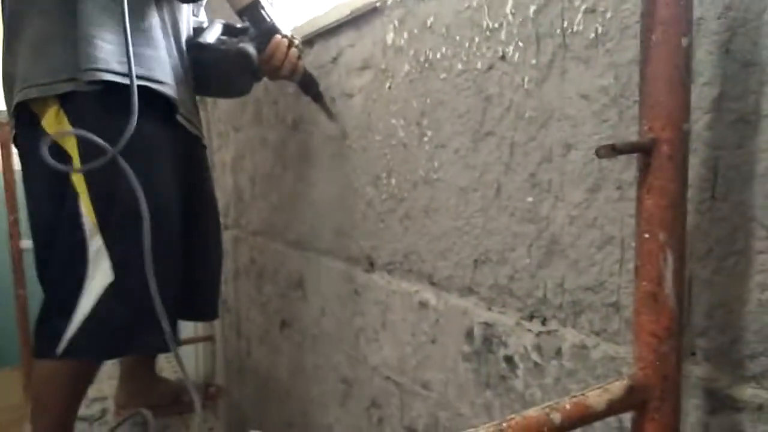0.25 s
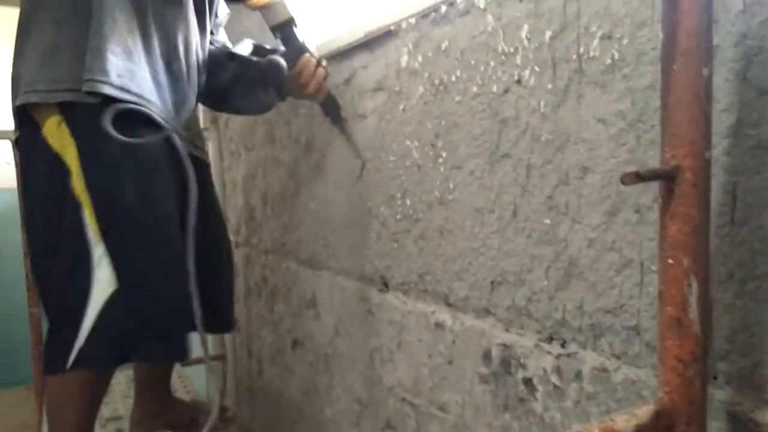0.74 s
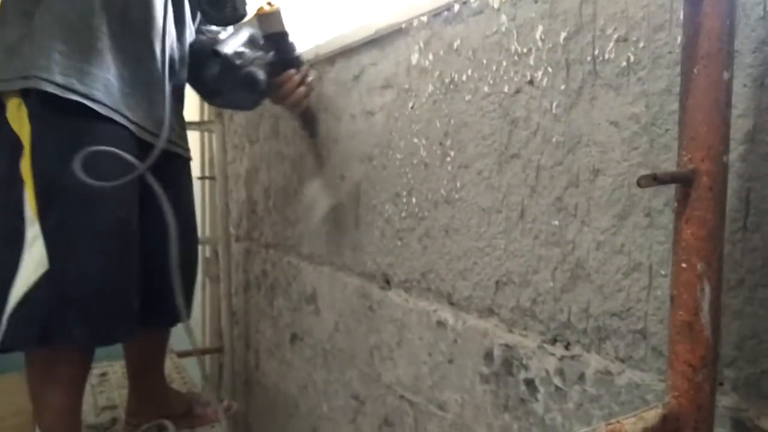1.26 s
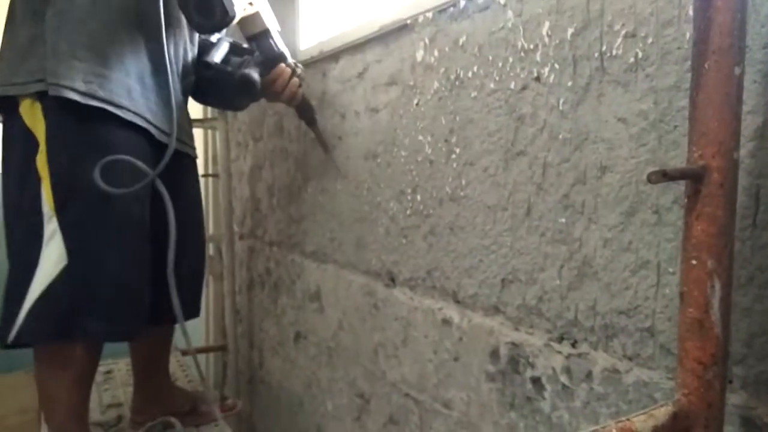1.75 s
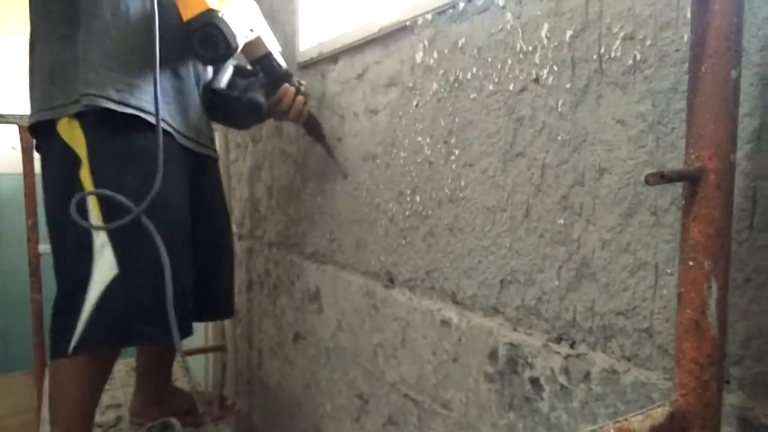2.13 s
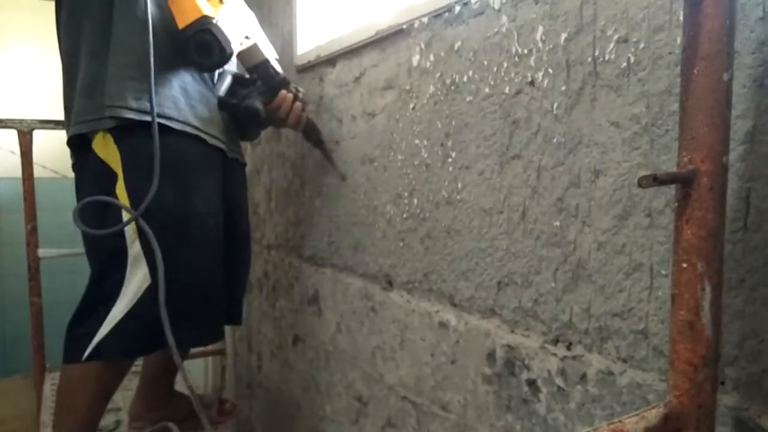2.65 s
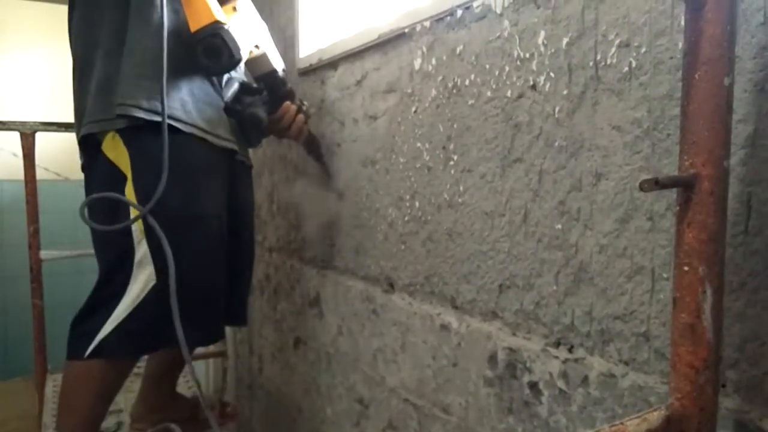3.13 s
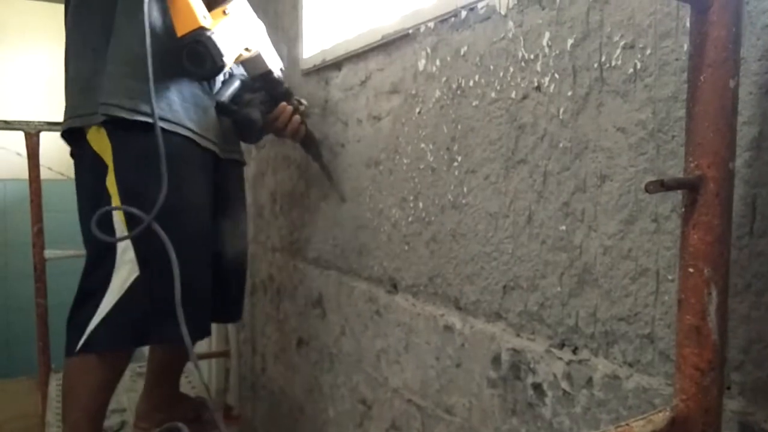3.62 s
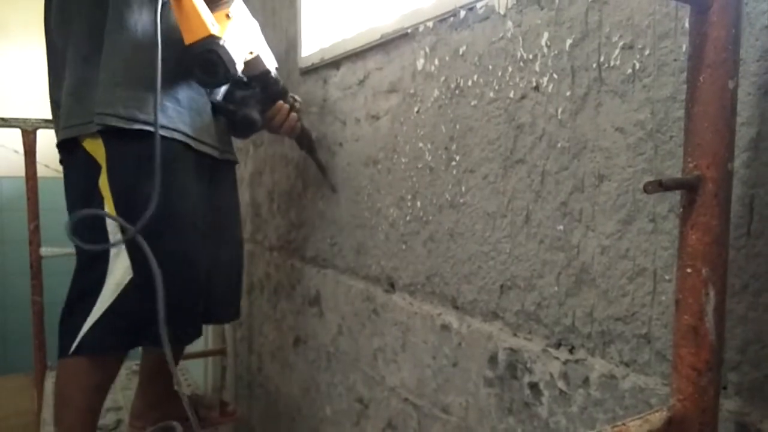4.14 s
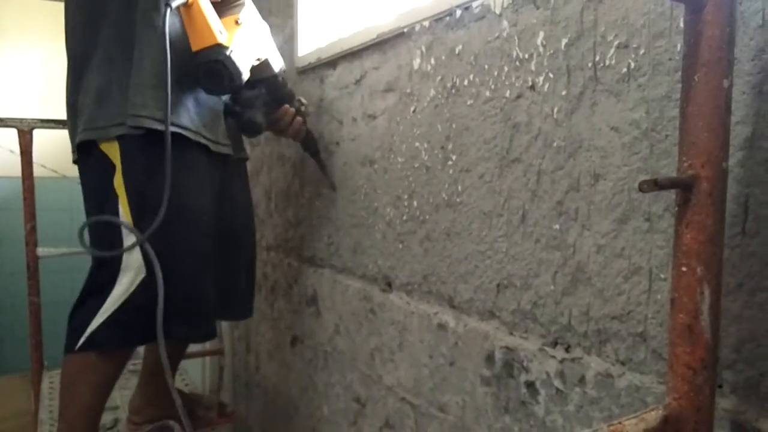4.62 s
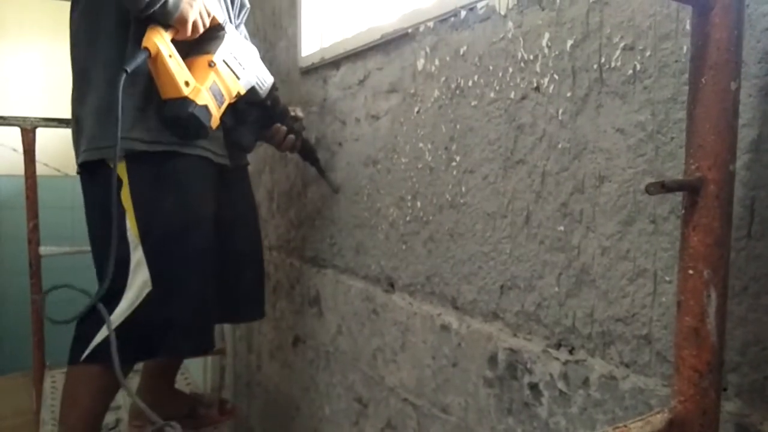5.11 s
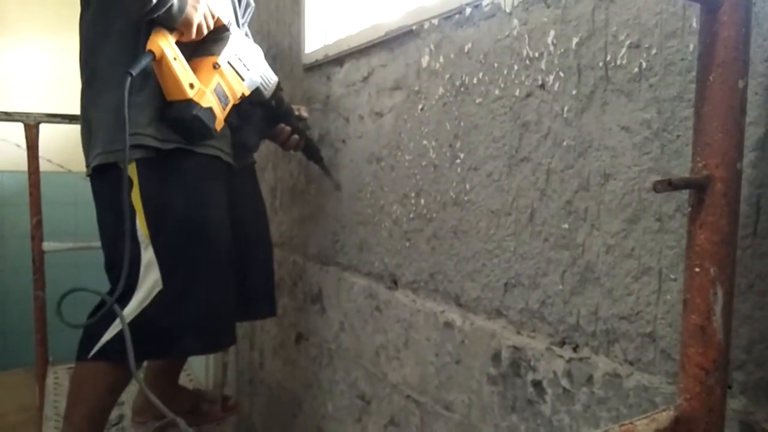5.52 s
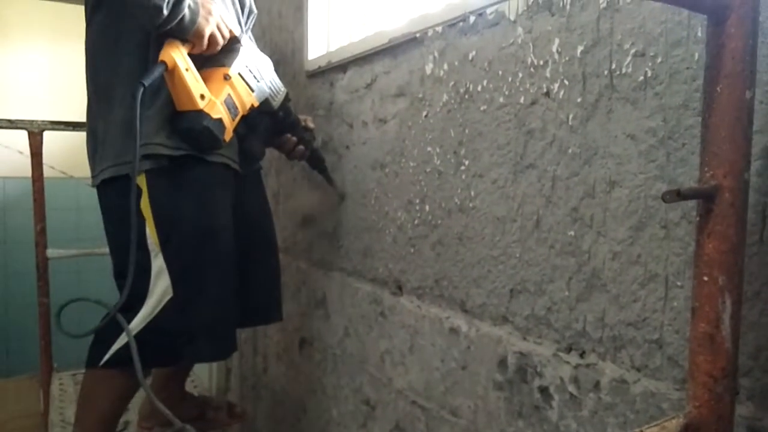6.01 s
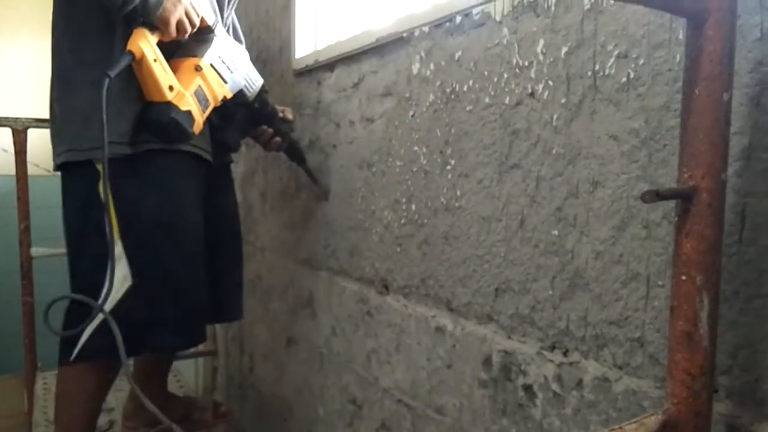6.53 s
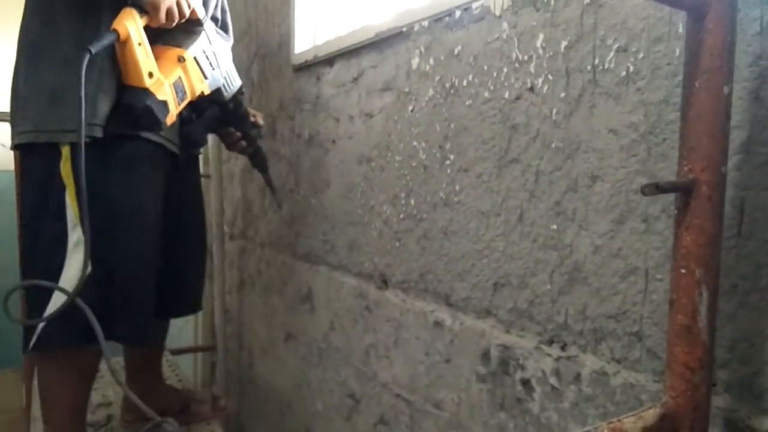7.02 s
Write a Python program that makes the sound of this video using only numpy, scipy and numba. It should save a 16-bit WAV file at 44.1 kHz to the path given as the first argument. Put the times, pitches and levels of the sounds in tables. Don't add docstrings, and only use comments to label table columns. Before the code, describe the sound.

Rapid hammering of a steel chisel on concrete in a bare hard room, three bursts with whirring run-downs, falling chips and low rumble.

```python
import sys
import numpy as np
from scipy import signal
from scipy.fft import rfft, irfft
from scipy.io import wavfile
from scipy.ndimage import uniform_filter1d
from numba import njit

SR = 44100
rng = np.random.default_rng(int(sys.argv[2]) if len(sys.argv) > 2 else 0)


def log_audio(samples):
    frames = np.atleast_2d(samples).T
    limited = np.clip(frames, -1, 1)
    pcm = np.round(limited * 32767).astype(np.int16)
    wavfile.write(sys.argv[1], SR, pcm)


def voltage_ratio(level):
    return 10 ** (np.asarray(level, float) / 20)


N = 320166


def rms_one(x):
    return x / np.sqrt(np.mean(x ** 2) + 1e-20)


def band(x, low_hz, high_hz, order=2):
    return signal.sosfilt(signal.butter(order, [low_hz, high_hz], "band", fs=SR, output="sos"), x)


def at_hz(points, hz):
    p = np.array(points)
    return np.interp(np.log(np.maximum(hz, 1)), np.log(p[:, 0]), p[:, 1])


def colour(x, spectrum):
    log_gain = np.log(voltage_ratio(at_hz(spectrum, np.linspace(0, SR / 2, 2049))))
    cepstrum = irfft(log_gain)
    cepstrum[1:2048] *= 2
    cepstrum[2049:] = 0
    return signal.oaconvolve(x, irfft(np.exp(rfft(cepstrum))))[:N]


def drift(rate_hz):
    knots = rng.standard_normal(int(N / SR * 200))
    return np.interp(np.arange(N) / SR * rate_hz, np.arange(len(knots)), knots)


def in_time(tables):
    t = np.arange(N) / SR
    s, *columns = np.concatenate(tables).T
    inside = sum((t >= rows[0][0]) & (t < rows[-1][0]) for rows in tables)
    return [np.interp(t, s, c) for c in columns], inside


def spells(rows, heights, edge_s):
    t = np.arange(N) / SR
    total = 0
    for (start_s, length_s, _), height in zip(rows, heights):
        to_edge_s = np.minimum(t - start_s, start_s + length_s - t)
        total = total + height * np.clip(to_edge_s / edge_s + .5, 0, 1)
    return total


def burst(clicks, t60_s):
    envelope = signal.lfilter([1], [1, -voltage_ratio(-60 / (t60_s * SR))], clicks + 1e-18)
    return envelope * rng.standard_normal(N)


def blows(per_s, running):
    jitter, rebound, spread_db = .18, .5, 2.2
    strokes = np.floor(np.cumsum(per_s * (1 + jitter * drift(40))) / SR)
    at = np.flatnonzero(np.diff(strokes) > 0)
    luck = rng.standard_normal((len(at), 3))
    rebound_s = np.abs(.006 + .002 * luck[:, 1])
    train = np.zeros(N + SR)
    train[at] = voltage_ratio(spread_db * luck[:, 0])
    train[at + (SR * rebound_s).astype(int)] += rebound * voltage_ratio(spread_db * luck[:, 2])
    run_starts = np.flatnonzero(np.diff(running * 1, prepend=0) > 0)
    train[run_starts] = 2.04
    return train[:N] * running


def patchy(x, low_hz, high_hz, depth_db, count=7):
    edges_hz = np.geomspace(low_hz, high_hz, count + 1)
    return x + sum(band(x, a, b) * (voltage_ratio(depth_db * drift(35)) - 1) for a, b in zip(edges_hz, edges_hz[1:]))


def concrete(train, force_db, hard_db):
    # frequency in Hz, level in dB per Hz.
    crack_spectrum = [(2350, -40.5), (4000, -16), (6140, -3.5), (7420, -7.5), (7720, 0), (8460, 1),
                      (10500, 6), (11000, 3.5), (12900, -13.5), (15700, -23.5)]
    # frequency in Hz, level in dB per Hz.
    crush_spectrum = [(150, -34), (300, -2), (480, -8.5), (900, -6.5), (1500, -3), (2100, 0.5),
                      (2900, -0.5), (3500, -4), (4800, -5), (6500, -6.5), (11000, -80)]
    crack_db = force_db + 0.52 * hard_db
    crush_db = force_db - 0.42 * hard_db
    crack = rms_one(colour(burst(train * voltage_ratio(crack_db), t60_s=0.01), crack_spectrum))
    crush = rms_one(colour(burst(train * voltage_ratio(crush_db), t60_s=0.025), crush_spectrum))
    crack = voltage_ratio(-23.5) * patchy(crack, 6200, 11100, depth_db=2.6)
    crush = voltage_ratio(-28) * patchy(crush, 750, 5200, depth_db=2.5)
    return crack + crush


@njit
def ring(force, radius, turn):
    out = np.zeros(len(force))
    for i in range(2, len(force)):
        out[i] = force[i] + 2 * radius[i] * np.cos(turn) * out[i - 1] - radius[i] ** 2 * out[i - 2]
    return out * np.sin(turn)


def bit_levels(running):
    # time in seconds, main mode level in dB.
    loose = [
        [(0.0, -15), (0.096, -25), (0.138, -15.5), (0.238, -33), (0.288, -17.5), (0.636, -32), (0.766, -19),
         (0.92, -32)],
        [(2.577, -13), (2.727, -23), (3.09, -28), (3.17, -13), (3.39, -18.5), (3.483, -7.5), (3.6, -17),
         (3.653, -26), (3.78, -24)],
        [(5.062, -12), (5.22, -14), (5.45, -18.5), (5.53, -42), (5.572, -10.5), (5.94, -35), (6.126, -15),
         (6.232, -24), (6.514, -10)],
    ]
    side_modes_db = [-30, -27, -25.5]
    # start in seconds, length in seconds, rise in dB.
    sings = [
        [(0.11, 0.21, 11), (0.55, .25, 9), (2.85, .18, 7), (5.6, 0.66, 0), (6.38, .08, 12)],
        [(0.05, 0.12, 12), (0.2, 0.66, 8), (0.74, 0.089, 4.5), (2.8, .15, 6), (3.24, .1, 8), (5.5, .15, 7),
         (5.8, 0.17, 5), (6.25, 0.18, 14)],
        [(0.06, 0.28, 8), (0.66, .3, 5), (2.59, 0.31, 10), (3.55, .08, 3), (5.6, .2, 3), (6.09, 0.27, 12)],
    ]
    stilled_s, stilled_db = 0.25, -43
    side_wander_db, side_tail_s, sing_edge_s = 1.5, .05, 0.028

    spans = [rows + [(rows[-1][0] + stilled_s, rows[-1][1] + stilled_db)] for rows in loose]
    (main_db,), sounding = in_time(spans)
    fade = np.exp(-1 / (side_tail_s * SR))
    tail = signal.lfilter([1 - fade], [1, -fade], running * 1.)
    held = tail * (1 - running) + running
    levels = [voltage_ratio(main_db)]
    for db, rows in zip(side_modes_db, sings):
        rise_db = spells(rows, np.transpose(rows)[2], sing_edge_s)
        levels.append(held * voltage_ratio(db + side_wander_db * drift(14) + rise_db))
    return levels, sounding


def bit(train, running):
    modes_hz = [7880, 9142, 10620, 11428, 13495, 15480]
    follows = [1, 2, 0, 3, 3, 3]
    trims_db = [-4, -6.5, 0, -6, -20, -25]
    free_t60_s = [.12, .12, .9, .12, .12, .12]
    pressed_t60_s = .095
    levels, sounding = bit_levels(running)
    out = np.zeros(N)
    for hz, k, trim_db, free_s in zip(modes_hz, follows, trims_db, free_t60_s):
        radius = voltage_ratio(-60 / (np.where(running, pressed_t60_s, free_s) * SR))
        tone = ring(train * rng.standard_normal(N), radius, 2 * np.pi * hz / SR)
        tone = tone / np.sqrt(np.abs(uniform_filter1d(tone ** 2, size=1800)) + 1e-5)
        out += tone * levels[k] * voltage_ratio(trim_db)
    return out * uniform_filter1d(sounding * 1., size=100)


def motor_gain():
    # on in seconds, off in seconds, standstill in seconds.
    pulls = [
        (-0.1, 1.0, 1.55),
        (2.478, 3.72, 4.31),
        (4.993, 6.55, 7.29),
    ]
    release_db = [-24.5, -25, -24.5]
    spin_up_s, spin_up_power = 0.092, 0.96
    load_rise_db, coast_sag_db, brake_share = 5, -10, 0.19
    t, gain = np.arange(N) / SR, 0
    for (on, off, still), db in zip(pulls, release_db):
        rising = np.clip((t - on) / spin_up_s, 0, 1)
        left = np.clip((still - t) / (still - off), 0, 1)
        load = np.clip((off - t) / (off - on), 0, 1)
        stopping = np.minimum(left / brake_share, 1) ** 2
        level = voltage_ratio(db + load_rise_db * load + coast_sag_db * (1 - left))
        gain = gain + level * rising ** spin_up_power * stopping
    return gain


def motor():
    # frequency in Hz, level in dB per Hz.
    whirr = [(150, -18), (260, -11.5), (640, -3), (1250, 0.5), (1520, -0.5), (1800, -0.5), (2600, -2),
             (4200, -7.5), (6200, -1), (7500, -4.5), (10500, -4.5), (11800, -14), (15700, -18.5)]
    # start in seconds, length in seconds, change in dB.
    grips = [
        (2.4, 2.2, -9),
    ]
    casing_hz, casing_db = 1550, -13
    body_power, body_full_db = 0.72, -25.5
    gain = motor_gain()
    hiss = rms_one(colour(rng.standard_normal(N), whirr))
    body = np.minimum(gain / voltage_ratio(body_full_db), 1) ** body_power
    hiss = hiss + (body - 1) * band(hiss, 300, 4500)
    casing = rms_one(band(rng.standard_normal(N), casing_hz - 35, casing_hz + 35))
    held_db = spells(grips, [grips[0][2]], edge_s=.2)
    flutter_db = .6 * drift(15) + .8 * drift(70)
    return (hiss + voltage_ratio(casing_db + held_db) * casing) * gain * voltage_ratio(flutter_db)


def chips():
    # landing in seconds, peak in dB, dull share in dB, ring in Hz, ring level in dB.
    flakes = [(0.944, -1.5, -10.5, 2690, -28), (1.169, -27.5, -1, 1503, 2), (1.64, -34, -5, 1100, -3),
              (1.794, -15, 5.5, 3640, -7), (1.812, -7, -18, 1835, -12.5), (2.0444, -24, -5.5, 13100, -33),
              (2.1819, -24, -22, 5870, -14), (2.1819, -21, -14, 13400, -34), (2.12, -33, -1, 5100, -19),
              (2.2129, -21.5, -15, 5890, -15), (3.6281, 1.5, -16, 1810, -24.5), (3.655, -10, -5, 1876, -12),
              (3.679, -3.5, -9, 3910, -19), (4.1572, -22, -3.5, 1844, -3), (4.245, -31, -9, 2100, -12),
              (4.2353, -24.5, -13, 10730, -14), (4.4852, -39.5, -3.5, 7330, -9.5),
              (4.594, -33, -6.5, 12900, -28), (4.601, -41, -2, 1317, -6), (4.723, -33.5, -3, 1470, -10),
              (4.823, -32.5, -6.5, 4600, -14), (6.4894, -19, -5, 2100, -9), (6.5554, -13, -8.5, 2155, -17),
              (6.566, -8.5, -5.5, 1985, -17)]
    # time in seconds, peak in dB,
    # dull share in dB.
    falls = [(0.9594, -20, -6), (1.04, -7.5, -11.5), (1.13, -30.5, 7), (1.296, -17, -6),
             (1.378, -20.5, -5.5), (1.428, -35, -27), (1.472, -18.5, -17), (1.6354, -27, -1.5),
             (1.651, -43, 5), (4.78, -44.5, 4), (4.91, -41, -6), (1.767, -8, -11.5), (1.7769, -4, -17.5),
             (1.85, -11, -19), (1.9603, -20.5, -7.5), (2.2314, -29, -0.5), (2.2894, -34, -4),
             (2.482, -32, -23), (2.5544, -17.5, 0.5), (4.8694, -33.5, -10), (4.99, -25, -24),
             (5.001, -28, -22), (5.014, -32, 5.5), (5.029, -28.5, 10), (5.0444, -35, -20),
             (5.5299, -4, -49), (6.5194, -16, -6), (7.175, -20.5, -34)]
    ring_range_hz = (1550, 8900)
    ring_t60_s, chip_ring_db = 0.14, -36

    rung = [(*row, np.exp(rng.uniform(*np.log(ring_range_hz))), chip_ring_db) for row in falls]
    s, peak_db, dull_db, hz, ring_db = np.transpose(flakes + rung)
    at = (s * SR).astype(int)
    bright, dull, rings = np.zeros((3, N + SR))
    bright[at] = voltage_ratio(peak_db - 0.5)
    dull[at] = voltage_ratio(peak_db + dull_db + 11.5)
    t = np.arange(SR // 2) / SR
    envelope = voltage_ratio(-60 * t / ring_t60_s) * (1 - np.exp(-t / 0.0012))
    for i, f, gain in zip(at, hz, voltage_ratio(peak_db + ring_db)):
        rings[i:i + len(t)] += gain * np.sin(2 * np.pi * f * t) * envelope
    breakup = t[:800] / 0.0015 * np.exp(-t[:800] / 0.0015) / (0.0021 * SR)
    tick = band(burst(signal.oaconvolve(bright, breakup)[:N], t60_s=0.034), 4030, 10500, order=3)
    thud = burst(signal.oaconvolve(dull, breakup)[:N], t60_s=0.05)
    knock = band(thud, 1510, 3590) - voltage_ratio(-13.5) * band(thud, 460, 1250)
    return tick + knock + rings[:N] * (0.89 + 0.45 * drift(110))


def room(x, count=60):
    # frequency in Hz, T60 in seconds.
    decay = [(300, 0.68), (2000, 0.45), (6000, 0.35), (14000, 0.31)]
    wet_db = 3.5
    t = np.arange(SR // 2) / SR
    edges_hz, tails = np.geomspace(150, 17000, 8), 0
    for low, high in zip(edges_hz, edges_hz[1:]):
        t60_s = at_hz(decay, np.sqrt(low * high))
        tails = tails + band(rng.standard_normal((count, len(t))), low, high) * voltage_ratio(-60 * t / t60_s)
    tails = tails * (1 - np.exp(-t / 0.0031))
    wet = np.zeros(N + len(t))
    for at, tail in zip(np.array_split(np.arange(N), count), tails):
        tail = tail / np.sqrt(np.sum(tail ** 2))
        wet[at[0]:at[-1] + len(t)] += signal.fftconvolve(x[at], tail)
    return x + voltage_ratio(wet_db) * wet[:N]


def air():
    # start in seconds, length in seconds, level in dB.
    gusts = [(0.133, 0.04, -21), (0.26, 0.076, -20.5), (0.444, 0.088, -24), (0.615, 0.26, -35),
             (0.896, 0.32, -34), (2.265, .06, -35), (2.65, 0.043, -27), (3.162, 0.07, -15.5),
             (5.119, 0.079, -19), (5.37, .025, -21), (5.456, .08, -29), (5.66, .035, -10),
             (5.726, 0.022, -10.5), (5.847, .06, -21.5), (6.022, 0.17, -15), (6.432, 0.092, -26.5)]
    # time in seconds, peak in dB.
    pops = [(0.153, -9), (0.316, -16), (0.4593, -13), (3.168, -7), (3.1763, -1), (3.1873, -3), (3.2174, -5),
            (3.279, -10.5), (5.1315, -16), (5.1413, -13), (5.1484, -3.5), (5.165, -17), (5.1762, -13),
            (5.1839, -11), (5.6556, -8), (5.6736, -10), (5.6806, -8), (5.7, -8), (5.7294, -13), (5.736, -6),
            (6.032, -8), (6.0423, -8.5), (6.059, -12), (6.0853, -14), (6.0989, -19), (6.1166, -10),
            (6.1304, -11.8), (6.153, -9), (6.1734, -9), (6.179, -10)]
    still_db, blown_db, gust_edge_s = -41, 3, 0.038
    blown_power = 1.68
    steady = voltage_ratio(still_db) + voltage_ratio(blown_db + 2.5 * drift(13)) * motor_gain() ** blown_power
    level = steady + spells(gusts, voltage_ratio(np.transpose(gusts)[2]), gust_edge_s)
    swings = rms_one(band(rng.standard_normal(N), 52, 231, order=3)) * level * voltage_ratio(-6.0 + 1.16 * drift(30))
    puffs = np.zeros(N)
    puffs[[int(s * SR) for s, db in pops]] = voltage_ratio(np.array(pops)[:, 1] + 30)
    return swings + band(puffs, 56, 670, order=3)


def site():
    # frequency in Hz, level in dB per Hz.
    rumble = [(25, -16), (60, -23), (250, -11), (500, -9), (900, -15), (1900, -13), (3500, -23.5),
              (4900, -32), (9500, -30), (15000, -60)]
    # frequency in Hz, width in Hz, level in dB.
    machines = [
        (79, 12.3, -46.5),
        (147.22, 10.5, -52.5),
        (235.3, 14.3, -51),
    ]
    out = voltage_ratio(-45.5) * rms_one(colour(rng.standard_normal(N), rumble))
    for hz, width_hz, db in machines:
        out = out + voltage_ratio(db) * rms_one(band(rng.standard_normal(N), hz - width_hz / 2, hz + width_hz / 2))
    return out


def drone():
    hz, level_db, ends_s = 313, -48, 2.24
    hum = rms_one(band(rng.standard_normal(N), hz - 60, hz + 60))
    return voltage_ratio(level_db) * hum * np.clip((ends_s - np.arange(N) / SR) / .3 + .5, 0, 1)


def scene():
    # time in seconds, force in dB, hardness of the stone under the tip in dB.
    runs = [
        [(0.0, -16.5, 3), (0.572, -16.5, 7.5), (0.694, -13.5, 0), (0.716, -17, 5.5), (0.906, -17, -1.5),
         (0.93, -31.5, 10)],
        [(2.533, -22, 1), (2.574, -35, -14)],
        [(2.577, -21, 8), (2.72, -18, 8.5), (3.09, -15, 1), (3.11, -23.5, 21), (3.17, -18, 8.5),
         (3.42, -16.5, 9), (3.52, -16.5, 3.5), (3.625, -21, 6), (3.69, -41, -23.5)],
        [(5.062, -16.5, 9), (5.25, -15.5, 6), (5.39, -17, 8), (5.41, -13, 6), (5.542, -21, -12),
         (5.56, -15, 9.5), (5.94, -16, 6.5), (6.428, -17.5, 6.5), (6.465, -23.5, -7)],
    ]
    (force_db, hard_db), running = in_time(runs)
    train = blows(75, running)
    wall = concrete(train, force_db, hard_db)
    debris = chips()
    near = room(wall + debris) + voltage_ratio(-8.5) * debris + bit(train, running) + motor()
    return np.tile(near + air() + site() + drone(), (2, 1))


def band_limit(x):
    return signal.sosfilt(signal.butter(12, 16860, fs=SR, output="sos"), x)


def record(dry):
    over_db = 10 * np.log10(uniform_filter1d(dry ** 2, size=900, axis=1) + 1e-12) + 11.2
    held = dry * voltage_ratio(-.6 * np.maximum(over_db, 0))
    rounded = .76 * np.tanh(held / .76)
    top_cut = signal.ellip(14, .5, 70, 15600, fs=SR, output="sos")
    return band_limit(signal.sosfilt(top_cut, rounded))


dry = scene()
out = record(dry)
log_audio(out)
```